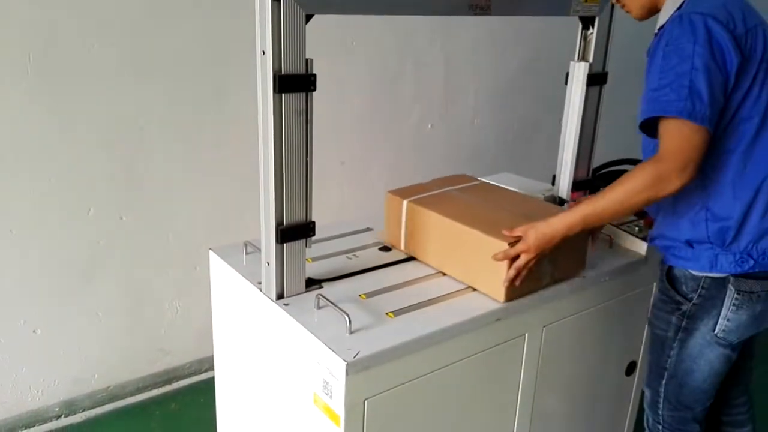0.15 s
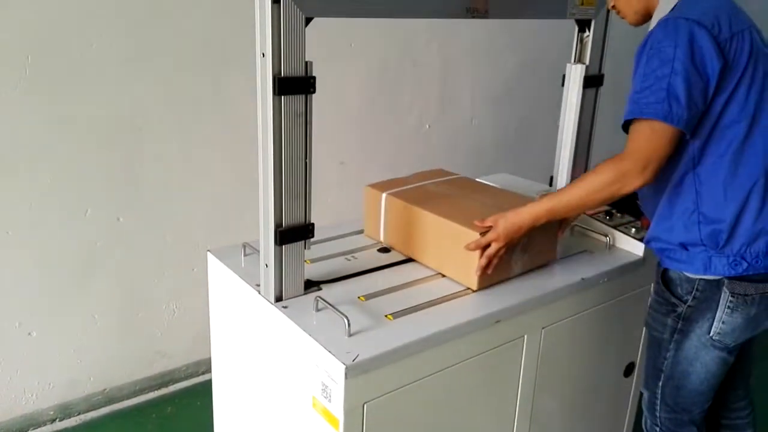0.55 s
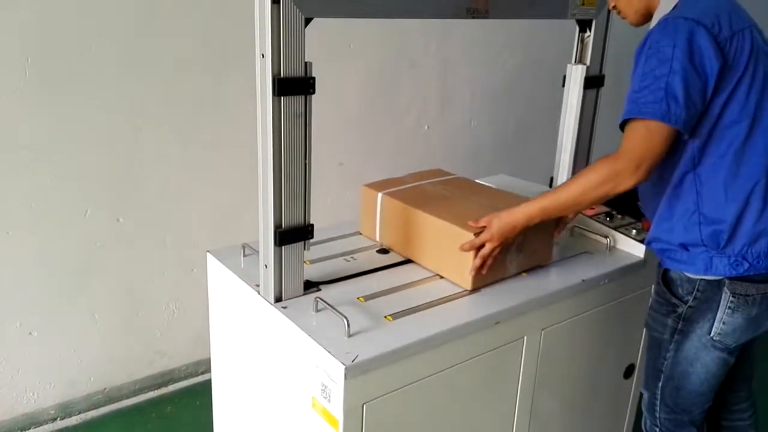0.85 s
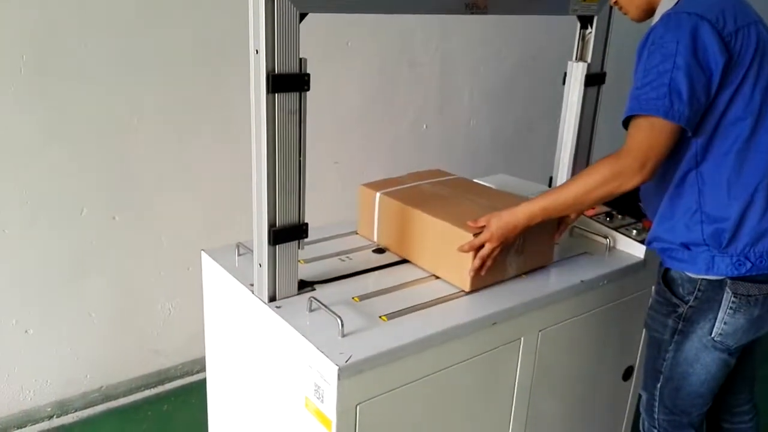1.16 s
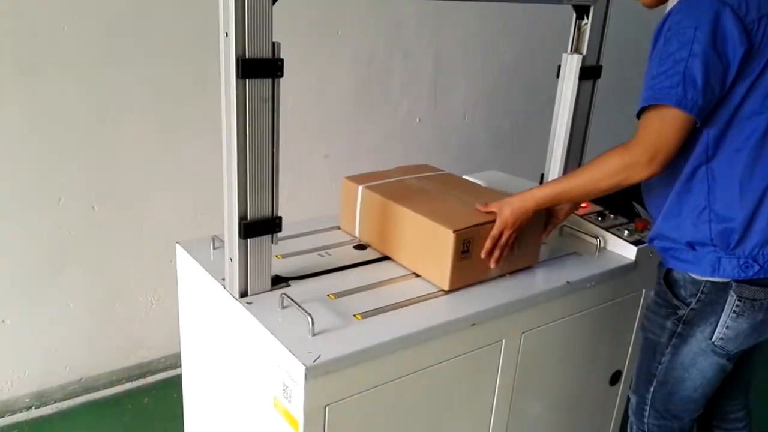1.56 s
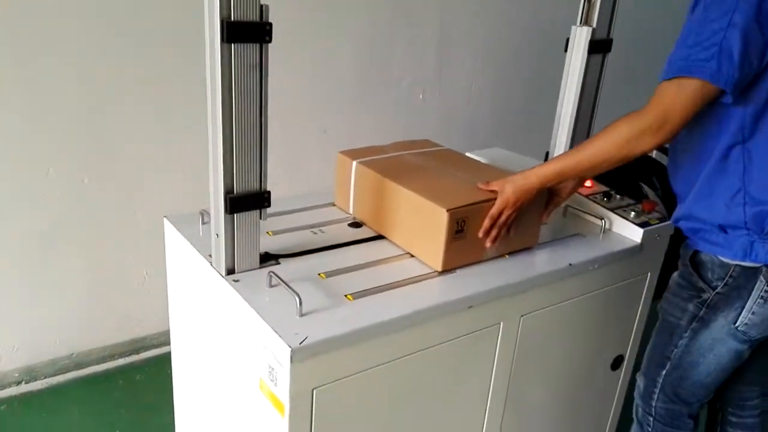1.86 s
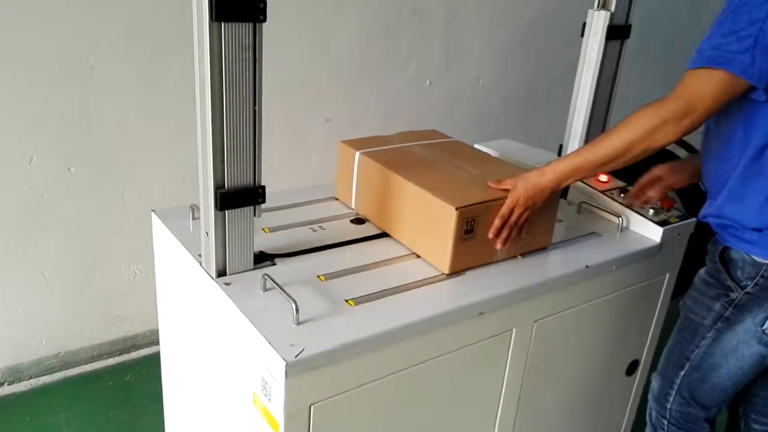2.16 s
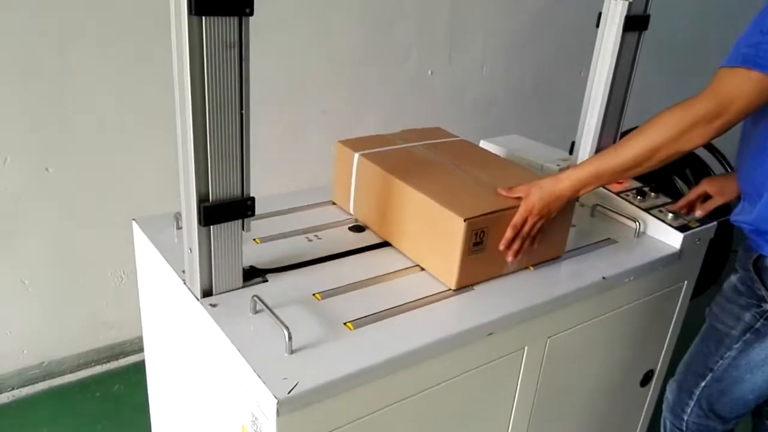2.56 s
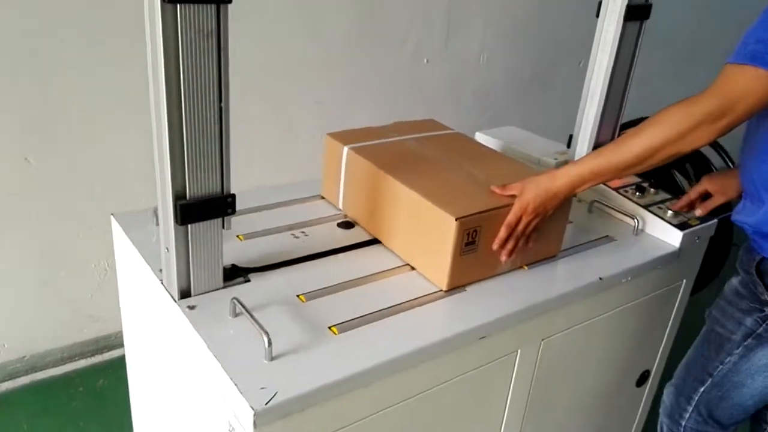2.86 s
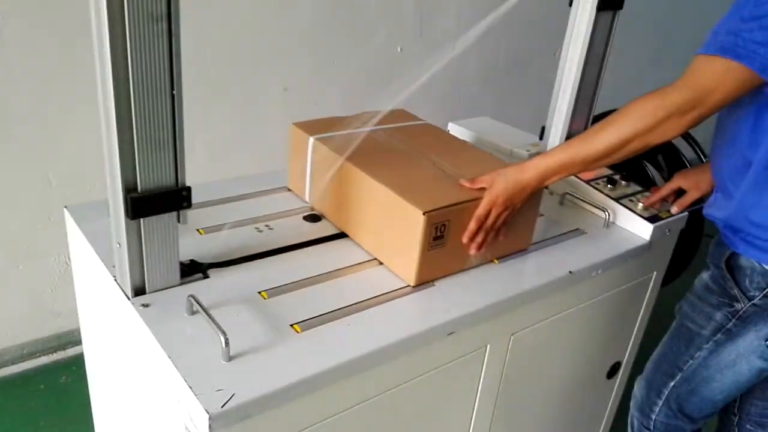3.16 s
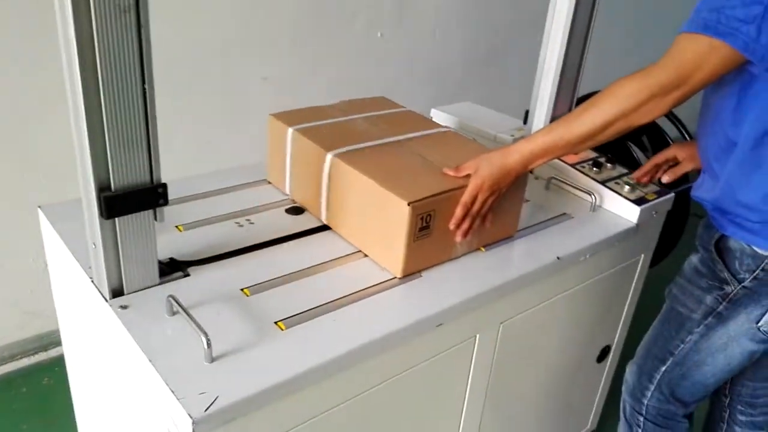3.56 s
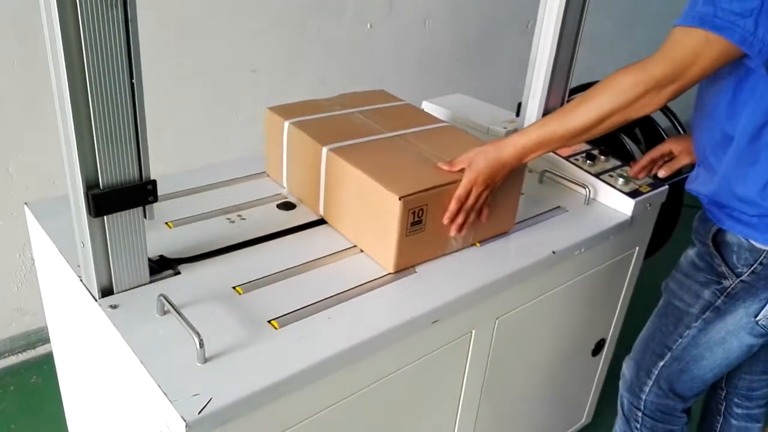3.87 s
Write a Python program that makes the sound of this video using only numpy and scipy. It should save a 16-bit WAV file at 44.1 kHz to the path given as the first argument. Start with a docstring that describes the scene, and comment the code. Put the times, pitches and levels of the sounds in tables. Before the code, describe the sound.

After a low hum, a strapping machine whirs, clatters and cinches a box with a crack.

```python
"""Hard-walled factory hall, automatic strapping machine. Its last cycle dies away; the motor hums while
a cardboard box is slid into place. A clutch knocks in, the geared drive whines, and plastic strap is
pulled rattling out of its arch until it snaps tight round the box. The cams clack on; the hall rings."""
import sys
import numpy as np
from scipy import signal
from scipy.fft import rfft, irfft
from scipy.io import wavfile

SR = 44100
rng = np.random.default_rng(int(sys.argv[2]) if len(sys.argv) > 2 else 0)


def int16_out(signal):
    """Quantize to a 16-bit WAV file."""
    q = np.round(np.clip(np.atleast_2d(signal).T, -1, 1) * 32767)
    wavfile.write(sys.argv[1], SR, q.astype(np.int16))


N = 176400
T = np.arange(N) / SR
SNAP_S, THROB_HZ, CUTOFF_HZ = 3.512, 8.8, 14450

# strap over rollers and guides: time_s, level_db
STRAP_ENVELOPE = [(3.05, -55), (3.075, -42.5), (3.1, -24), (3.135, -30.5), (3.16, -24.5), (3.21, -26.5),
                  (3.27, -31), (3.33, -30), (3.43, -28), (3.48, -36), (3.51, -29), (3.54, -74)]
# running strap: freq_hz, gain_db
STRAP_SPECTRUM = [(150, -23), (450, -8), (900, -4.5), (1200, 4), (3300, 1), (6000, 1), (10000, -1),
                  (14000, -6)]
# strap hitting the box: freq_hz, gain_db
SNAP_SPECTRUM = [(100, -13.5), (520, 1.5), (1400, 2.5), (3600, -7.5), (4500, 3), (5800, -4), (7500, 4),
                 (9500, 0), (13300, 3)]
# ring after the snap: pitch_hz, level_db, t60_s
SNAP_RING_MODES = [(4240, -7.5, 0.012), (4690, -4, 0.01)]
# arch flaps, gripper, cams: start_s, level_db, rise_s, decay_s, tilt_db_per_octave
CLACK_HITS = [(3.067, -32, .002, 0.015, 4), (3.095, -28, 0.0012, 0.019, -4.5),
              (3.144, -15.5, 0.0071, 0.012, -1.5), (3.217, -19.5, .004, 0.008, 5.5),
              (3.292, -13, 0.0025, 0.01, 3.5), (3.431, -22, 0.00071, 0.0017, -1),
              (3.489, -23, 0.00082, 0.014, 5.5), (3.524, -20, 0.00054, 0.0036, 0),
              (3.826, -37.5, 0.0054, 0.017, -0.5), (3.894, -40.5, 0.0024, 0.022, 1),
              (3.993, -34.5, 0.004, 0.018, -1)]
# metal clack: freq_hz, gain_db
CLACK_SPECTRUM = [(70, -21), (150, -15), (240, -2), (350, -10.5), (800, 1.5), (2000, 4), (3300, 4.5),
                  (4500, 6.5), (5800, -0.5), (8000, 4), (10200, 2.5), (14000, -3.5)]
# gear whine: time_s, mesh_db, octave_db
WHINE_ENVELOPE = [(2.96, -55.5, -90), (2.985, -45.5, -74), (3.05, -56, -64), (3.22, -41.5, -43.5),
                  (3.33, -37.5, -33.5), (3.485, -43.5, -39), (3.53, -74, -70)]
# drive rumble: time_s, level_db
DRIVE_ENVELOPE = [(2.93, -96), (2.945, -48.5), (3.05, -45.5), (3.1, -35.5), (3.3, -43), (3.5, -39.5),
                  (3.62, -42.5), (3.78, -50.5), (3.86, -44.5), (4, -53)]
# drive rumble: freq_hz, gain_db
DRIVE_SPECTRUM = [(40, -19), (90, -12.5), (135, -0.5), (230, 1), (345, -12.5), (520, -1.5), (1000, -3.5),
                  (1600, -2), (3000, -13.5), (4800, -8), (13000, -17)]
# clutch latch resonances: freq_hz, gain_db
LATCH_SPECTRUM = [(700, -11), (1200, -22), (2300, -1.5), (3400, -17), (5100, 5.5), (6200, -2), (7300, 4),
                  (9500, -6), (13500, -7.5)]
# clutch and cam knocks: start_s, level_db
KNOCK_HITS = [(2.94, -42.5), (2.975, -44), (3.292, -37), (3.645, -41)]
# steel cabinet: pitch_hz, level_db, t60_s
CABINET_MODES = [(222, -3, 0.2), (460, -6, .14), (693, -0.5, 0.1), (779, -4.5, 0.11)]
# box and hand on the table: start_s, rise_s, hold_s, decay_s, level_db
RUB_STROKES = [(0.058, 0.083, 0.29, 0.2, -63), (0.607, 0.025, .01, 0.045, -69),
               (1.42, .01, 0.023, 0.053, -70), (1.833, 0.018, 0.094, 0.46, -71),
               (2.776, 0.024, 0.032, 0.056, -57.5)]
# cardboard friction: freq_hz, gain_db
RUB_SPECTRUM = [(200, -10.5), (700, -0.5), (1500, -1.5), (2200, -0.5), (3300, -4.5), (4800, 1.5),
                (13000, -3.5)]
# box and finger taps: start_s, level_db, tilt_db_per_octave
TAP_HITS = [(0.804, -52, 6), (1.0506, -53.5, 7), (1.812, -57, 5), (1.845, -50, 8.5), (2.067, -58, 2),
            (2.248, -50.5, -2.5), (2.288, -51, 4.5)]
# light tap: freq_hz, gain_db
TAP_SPECTRUM = [(2400, -16), (3800, 1.5), (6000, -6), (11000, -8.5), (14500, -15)]
# motor hum, louder under load: time_s, low_tone_db, high_tone_db
HUM_ENVELOPE = [(0, -62.5, -65), (1.1, -64.5, -75.5), (2.93, -65.5, -82), (3.15, -49.5, -48.5),
                (4, -57, -56.5)]
# echo of the last cycle: freq_hz, gain_db
LAST_CYCLE_SPECTRUM = [(100, -3), (350, -4.5), (1400, -2), (4000, -5.5), (13000, -22)]
# hall air: freq_hz, gain_db
AIR_SPECTRUM = [(20, -4), (60, -6), (95, -12), (135, -4), (195, -12), (420, -15), (1100, -18.5),
                (2200, -23), (3000, -29.5), (14000, -36)]
# hall decay: freq_hz, t60_s
HALL_DECAY = [(100, 3), (900, 1.5), (4500, 1.02), (9000, 0.58), (14000, 0.44)]
# hall echo: freq_hz, gain_db
HALL_SPECTRUM = [(40, -4), (150, -0.5), (600, 1), (1500, -0.5), (3400, -1), (13000, 1)]
# left-right likeness of noise: freq_hz, coherence
COHERENCE = [(60, 0.99), (250, 0.97), (550, 0.8), (1100, 0.056), (13000, 0)]
# stereo balance: freq_hz, left_minus_right_db
BALANCE = [(700, 0), (1300, 2), (3000, -2.5), (5300, -0.5), (8700, -6), (14000, -7.5)]


def strap(ticks_per_s=1500, spread_db=3.5, flutter_db=1.2, echo_gain=0.46, echo_s=0.006, sway=0.0403):
    """Stiff strap rushes through guides: ticks over hiss. The table echo shifts as the loop sways."""
    sizes = amp(spread_db * np.minimum(rng.exponential(1, N), 3))
    ticks = sizes * (rng.random(N) < ticks_per_s / SR) * rng.choice([-1., 1.], (2, N))
    rush = unit(unit(ticks) + noise()) * amp(flutter_db * drift(100))
    delayed_s = T - echo_s * (1 + sway * drift(10.1))
    echo = np.array([np.interp(delayed_s, T, side) for side in rush])
    return colour(unit(rush + echo_gain * echo) * envelope(STRAP_ENVELOPE), STRAP_SPECTRUM)


def snap(width_s=0.0011):
    """Strap whips onto the box: crack, short shiver."""
    crack = amp(-6.5) / np.cosh(np.clip((T - SNAP_S) / width_s, -20, 20))
    shiver = amp(-19.5) * burst(SNAP_S, rise_s=0.0017, decay_s=0.013)
    return colour(noise() * (crack + shiver), SNAP_SPECTRUM)


def puff(lag_s=0.0014, width_s=0.00244):
    """The struck box gives one low push of air."""
    return -amp(-20.5) * pan(4) * np.exp(-((T - SNAP_S - lag_s) / width_s) ** 2)


def clacks():
    """Loose metal parts strike and chatter."""
    chatter = noise()
    return sum(amp(db) * colour(chatter * burst(start_s, rise_s, decay_s), CLACK_SPECTRUM, tilt)
               for start_s, db, rise_s, decay_s, tilt in CLACK_HITS)


def gears(mesh_hz=694.7, waver=0.00507, rough_hz=36, right_lag_s=0.00022, flutter_db=4):
    """Rough mesh tone; its cleaner octave, left of centre, grows as the strap is drawn back."""
    phase = 2 * np.pi * np.cumsum(mesh_hz * (1 + waver * drift(41.3))) / SR
    mesh = unit((1.4 + drift(rough_hz)) * np.sin(phase) + drift(rough_hz) * np.cos(phase))
    stereo_phase = phase - 2 * np.pi * mesh_hz * np.array([[0], [right_lag_s]])
    octave = unit(np.sin(2 * stereo_phase)) * amp(flutter_db * drift(35))
    return envelope(WHINE_ENVELOPE) * mesh + pan(3) * envelope(WHINE_ENVELOPE, column=2) * octave


def latch():
    """The latch clicks the clutch in."""
    return amp(-31) * colour(noise() * burst(2.937, rise_s=0.0017, decay_s=0.013), LATCH_SPECTRUM)


def drive(rattle_db=2.5):
    """The cam drive rumbles in its cabinet."""
    return colour(noise() * envelope(DRIVE_ENVELOPE) * amp(rattle_db * drift(45)), DRIVE_SPECTRUM)


def knocks():
    """Clutch and cams knock the hollow steel cabinet."""
    return sum(amp(db) * ring(CABINET_MODES, start_s, rise_s=0.0028) for start_s, db in KNOCK_HITS)


def rubs(rough_db=1.5):
    """Cardboard and hand rub over the steel table."""
    strokes = sum(amp(db) * burst(start_s, rise_s, decay_s, hold_s)
                  for start_s, rise_s, hold_s, decay_s, db in RUB_STROKES)
    return colour(noise() * strokes * amp(rough_db * drift(82)), RUB_SPECTRUM)


def taps(rise_s=0.00037, decay_s=0.0026):
    """Crisp ticks of box edges and fingers."""
    return sum(amp(db) * colour(noise() * burst(start_s, rise_s, decay_s), TAP_SPECTRUM, tilt)
               for start_s, db, tilt in TAP_HITS)


def motor(low_hz=133.6, high_hz=281.3, beat_gain=0.22, waver=0.12):
    """Two hum tones, each beating with a weaker one just above."""
    hum = 0
    for column, hz in enumerate((low_hz, high_hz), start=1):
        beating = np.sin(2 * np.pi * hz * T) + beat_gain * np.sin(2 * np.pi * (hz + THROB_HZ) * T)
        wander = waver * column * narrow_noise(hz, width_hz=24)
        hum += envelope(HUM_ENVELOPE, column) * unit(beating + wander)
    return hum


def last_cycle(whine_hz=1415, swell_s=0.04, swell_width_s=0.019, fade_db_per_s=29):
    """Echo of the last cycle: gear whine swells once, then throbs away."""
    whine = np.array([narrow_noise(whine_hz, width_hz=25) for _ in range(2)])
    throb = 1 + 0.25 * np.cos(2 * np.pi * THROB_HZ * (T - swell_s))
    swell = amp(-54) * np.exp(-((T - swell_s) / swell_width_s) ** 2) * np.sin(2 * np.pi * whine_hz * T)
    echo = amp(-55) * colour(noise(), LAST_CYCLE_SPECTRUM) + amp(-64.5) * whine * throb
    return amp(-fade_db_per_s * T) * echo + swell


def air():
    """Steady hall noise."""
    return amp(-61.5) * colour(noise(), AIR_SPECTRUM)


def hall(x, gap_s=0.0045, early_db=5, early_s=0.026):
    """Diffuse echo, stronger at first from the near wall; each band decays at its own rate."""
    hz, frame_s, bands = signal.stft(noise()[:, :2 * SR], SR, nperseg=256)
    decay = amp(-60 * frame_s / at_freq(HALL_DECAY, hz)[:, None])
    tail = signal.istft(bands * decay, SR, nperseg=256)[1]
    age_s = T[:tail.shape[1]]
    tail *= np.clip(age_s / gap_s - 1, 0, 1)
    tail *= 1 + (amp(early_db) - 1) * np.exp(-age_s / early_s)
    echo = signal.fftconvolve(x, tail / np.linalg.norm(tail[0]), axes=1)[:, :N]
    return colour(echo, HALL_SPECTRUM)


def amp(db):
    """dB to gain."""
    return 10 ** (np.asarray(db) / 20)


def unit(x):
    """Scale to rms 1."""
    return x / np.sqrt(np.mean(x ** 2) + 1e-20)


def at_freq(table, hz):
    """Interpolate over log frequency."""
    freq_hz, values = np.transpose(table)
    return np.interp(np.log(hz + 1), np.log(freq_hz), values)


def envelope(table, column=1):
    """Gain from a dB curve, silent before its start."""
    rows = np.array(table)
    return amp(np.interp(T, rows[:, 0], rows[:, column])) * (T >= rows[0, 0])


def burst(start_s, rise_s, decay_s, hold_s=0):
    """Linear attack, hold, exponential release."""
    attack = np.clip((T - start_s) / rise_s, 0, 1)
    return attack * np.exp(-np.maximum(T - start_s - rise_s - hold_s, 0) / decay_s)


def ring(modes, start_s, rise_s):
    """Damped modes of a struck part, phases offset per channel."""
    age_s = np.maximum(T - start_s, 0)
    sound = 0
    for hz, db, t60_s in modes:
        offset_s = rng.uniform(0, 5e-5, (2, 1))
        sound += amp(db - 60 * age_s / t60_s) * np.sin(2 * np.pi * hz * (age_s + offset_s))
    return sound * np.minimum(age_s / rise_s, 1)


def noise():
    """Stereo white noise, coherent in the bass."""
    left, other = rfft(rng.standard_normal((2, N)))
    coherence = np.clip(at_freq(COHERENCE, np.fft.rfftfreq(N, 1 / SR)), -1, 1)
    right = coherence * left + np.sqrt(1 - coherence ** 2) * other
    return irfft(np.array([left, right]), N)


def drift(rate_hz):
    """Slow random motion, rms 1."""
    hz = np.fft.rfftfreq(N, 1 / SR)
    return unit(irfft(rfft(rng.standard_normal(N)) * np.exp(-(hz / rate_hz) ** 2), N))


def narrow_noise(hz, width_hz):
    """Tone wandering in level and phase."""
    return drift(width_hz) * np.cos(2 * np.pi * hz * T) + drift(width_hz) * np.sin(2 * np.pi * hz * T)


def colour(x, spectrum, tilt_db_per_octave=0, size=4096):
    """Minimum-phase filter, unit energy below the cutoff; tilt acts above 500 Hz."""
    hz = abs(np.fft.fftfreq(size, 1 / SR))
    log_gain = np.log(amp(at_freq(spectrum, hz) + tilt_db_per_octave * np.log2(np.maximum(hz, 500))))
    impulse = np.fft.ifft(np.exp(np.conj(signal.hilbert(log_gain)))).real[:size // 2]
    impulse /= np.sqrt(np.mean(np.exp(2 * log_gain) * (hz < CUTOFF_HZ)))
    return signal.oaconvolve(x, impulse[None], axes=1)[:, :N]


def pan(left_minus_right_db):
    """Left and right gains."""
    return amp(np.vstack([left_minus_right_db / 2, -left_minus_right_db / 2]))


def lean(x):
    """Pan by frequency: treble leans right."""
    gains = pan(at_freq(BALANCE, np.fft.rfftfreq(2 * N, 1 / SR)))
    return irfft(rfft(x, 2 * N) * gains)[:, :N]


def scene(ring_lead_s=0.000791):
    """All sources with their hall sends; the snap sits left."""
    handling = rubs() + taps()
    machine = latch() + drive() + knocks() + strap() + clacks()
    whine = gears()
    crack = snap()
    ringing = ring(SNAP_RING_MODES, SNAP_S - ring_lead_s, rise_s=0.00047)
    send = amp(-4.5) * handling + amp(-4) * machine + amp(-7) * whine
    send += amp(-8.5) * crack + amp(-20) * ringing
    room = last_cycle() + air() + motor() + handling + machine + whine + hall(send)
    return lean(room) + pan(2.5) * (crack + ringing) + puff()


def record(dry):
    """The loudest crack clips at full scale; then low-pass."""
    low_pass = signal.firwin(301, CUTOFF_HZ, window=("kaiser", 8), fs=SR)
    return signal.oaconvolve(np.clip(dry, -1, 1), low_pass[None], "same")


dry = scene()
out = record(dry)
int16_out(out)
```